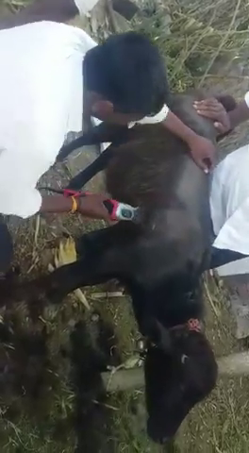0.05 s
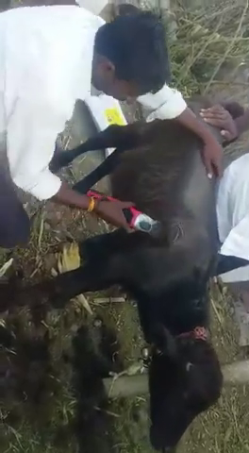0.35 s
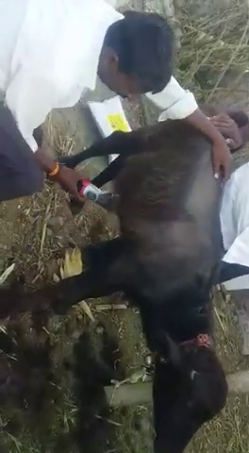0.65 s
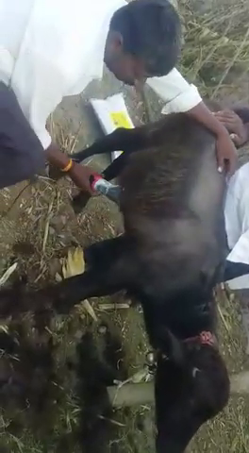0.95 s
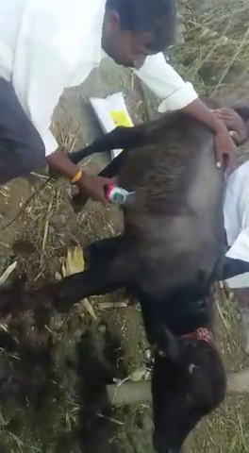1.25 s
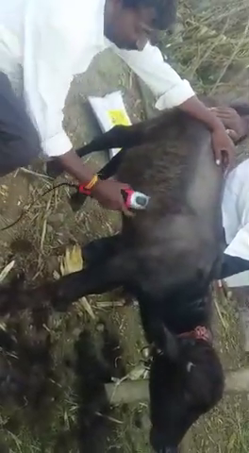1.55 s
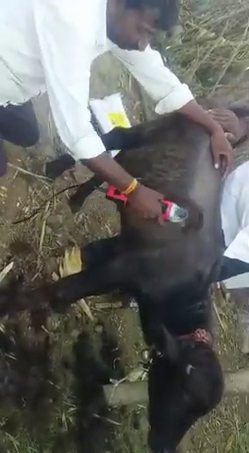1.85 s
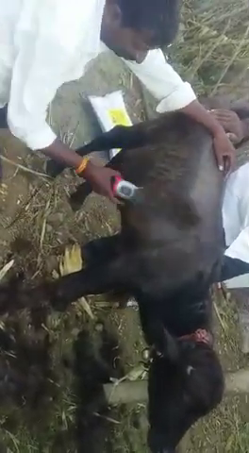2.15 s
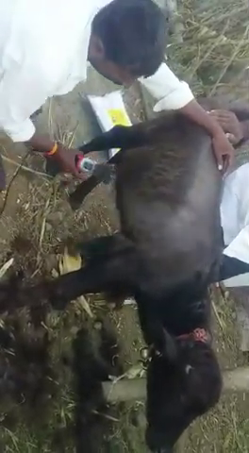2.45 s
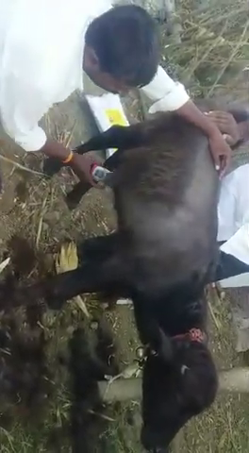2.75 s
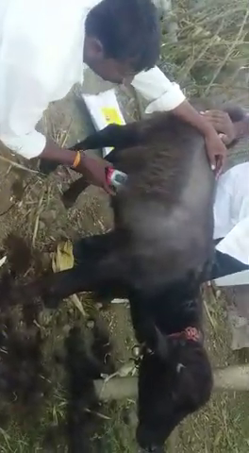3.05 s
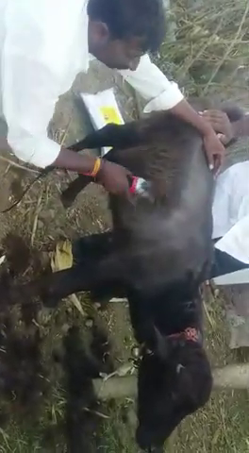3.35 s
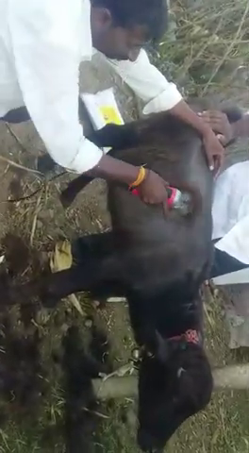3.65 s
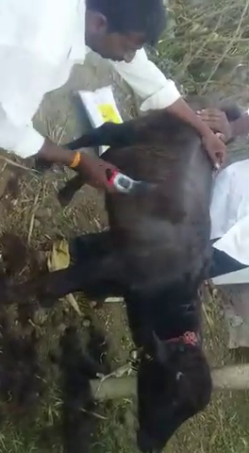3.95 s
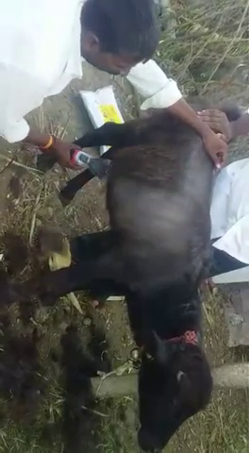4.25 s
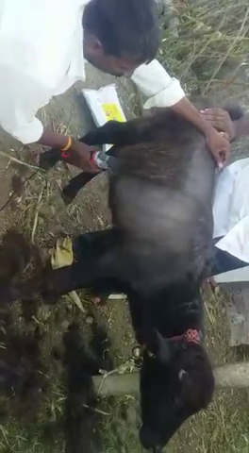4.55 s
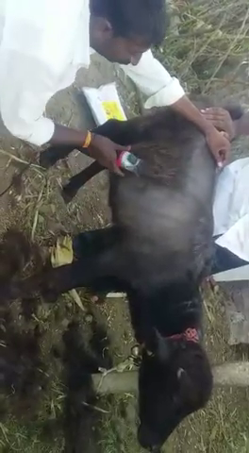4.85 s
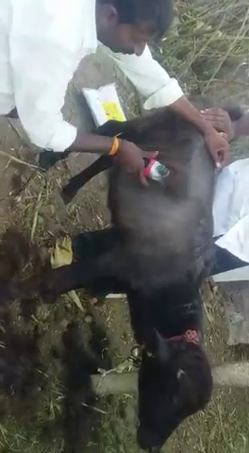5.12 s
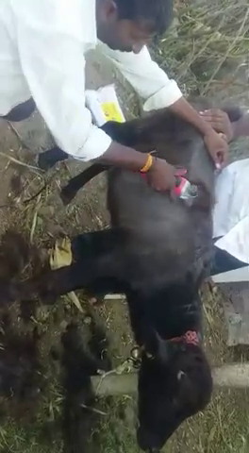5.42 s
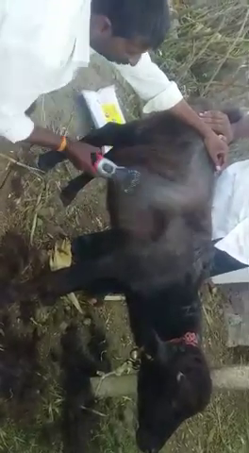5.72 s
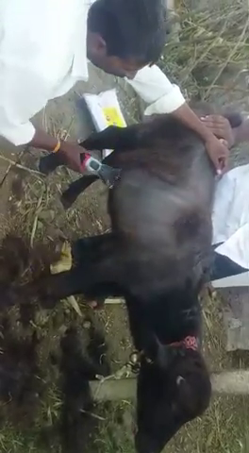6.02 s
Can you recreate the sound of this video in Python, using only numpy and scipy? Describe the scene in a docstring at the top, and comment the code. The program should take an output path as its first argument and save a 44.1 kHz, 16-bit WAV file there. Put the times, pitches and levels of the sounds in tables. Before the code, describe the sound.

An electric clipper buzzes and whines loudly as it shears a calf outdoors, with faint low bumps of wind on the microphone.

```python
"""An electric animal clipper shears a calf outdoors, in long passes through its coat.
Sliding friction of the cutter on its comb excites the housing, blade plates and tooth tips, biting
after each reversal. The gears whine at harmonics of the shaft rate, which sags under load,
and contact with the animal adds a low drone. Puffs of turbulent wind bump the microphone."""
import sys
import numpy as np
from scipy import signal
from scipy.fft import rfft, irfft, next_fast_len
from scipy.io import wavfile
from scipy.ndimage import uniform_filter1d, map_coordinates

SR = 44100
rng = np.random.default_rng(int(sys.argv[2]) if len(sys.argv) > 2 else 0)


def pcm_store(signal):
    """Save signal as 16-bit PCM."""
    levels = np.round(np.clip(np.atleast_2d(signal), -1, 1) * 32767)
    wavfile.write(sys.argv[1], SR, levels.astype(np.int16).T)


N = 268128

# Spectra of the rasp's four bands. Each row: frequency in Hz, relative spectral level in dB.
HOUSING_SPECTRUM = [(150, -67), (330, -18), (600, -27.5), (720, -15.5), (850, -13), (1050, -7.5),
                    (1400, -1.5), (2200, 0.5), (2550, -1), (2800, -5.5), (3200, -6.5), (3800, -77)]
BLADE_SPECTRUM = [(2400, -29), (3000, -16.5), (3380, -3), (3600, -1), (4000, 1), (4550, 0), (4800, -1),
                  (5200, -2.5), (5450, -0.5), (5800, -4), (6500, -28)]
TIP_SPECTRUM = [(5000, -37.5), (6000, -5.5), (6350, -2), (6900, -2), (7300, -0.5), (8100, 0), (8600, -8),
                (9300, -22), (10500, -45)]
FIZZ_SPECTRUM = [(7000, -13.5), (9300, 3.5), (10300, 0.5), (11200, 2.5), (14200, 1), (15700, -6)]

def cutter(turns, load):
    """Forced vibration: friction drives the housing, blade plates and tooth tips, with a fizz on top."""
    housing_db = loaded_level(load, free_db=-25.5, load_db=5.44, drift_db=0.2)
    blade_db = loaded_level(load, free_db=-23.5, load_db=3.1, drift_db=0.2)
    tips_db = loaded_level(load, free_db=-25, load_db=2, drift_db=0.2)
    pressure = mesh_pressure(turns)
    snag = amp(0.49 * wobble(60) + 0.16 * wobble(260))  # hair catches unevenly between the teeth

    def rasp(spectrum, throb_db, **sliding):
        return coloured(snag * amp(throb_db * pressure) * friction(turns, **sliding), spectrum)

    housing = rasp(HOUSING_SPECTRUM, throb_db=0, depth=1.11, repeat=0.4, grain_db=0.1)
    blade = rasp(BLADE_SPECTRUM, throb_db=0.86, depth=0.97, repeat=0.15, grain_db=1)
    tips = rasp(TIP_SPECTRUM, throb_db=2.2, depth=0.65, repeat=0.13, grain_db=1)
    fizz = rasp(FIZZ_SPECTRUM, throb_db=1.4, depth=0.83, repeat=0.074, grain_db=3)
    out = amp(housing_db) * resonances(housing, GRIP_MODES, patchy_db=1.68, chatter_db=1.85)
    out += amp(blade_db) * resonances(blade, GRIP_MODES, patchy_db=2.97, chatter_db=1.05)
    out += amp(tips_db) * resonances(tips, [], patchy_db=3.5, chatter_db=-0.5)
    return out + amp(-41 + 0.27 * wobble(3.3)) * resonances(fizz, [], patchy_db=1.5, chatter_db=2)


# Friction over one to-and-fro stroke. Each row: fraction of the stroke, relative level in dB.
STROKE_FRICTION = [(0, .5), (.15, -2.5), (.335, -6.5), (.37, 1), (.5, -.5), (.73, 1), (.835, -4.5),
                   (.875, 4.5), (.95, 2.5)]

def friction(turns, depth, repeat, grain_db):
    """Sliding friction: steel rubs partly the same track each stroke, stalls at reversal, then bites."""
    strokes = turns * (13 / 28)  # gear ratio
    place = strokes % 1
    track = rng.standard_normal(int(N / strokes[-1]))
    recurring = unit(map_coordinates(track, [place * len(track)], mode="grid-wrap"))
    grit = np.sqrt(repeat) * recurring + np.sqrt(1 - repeat) * rng.standard_normal(N)
    friction_db = depth * np.interp(place, *np.transpose(STROKE_FRICTION), period=1)
    return grit * amp(friction_db + grain_db * wobble(700))


# Modes of housing and blade plate that sing out as the grip shifts.
# Each row: peak time in seconds, half length in seconds, frequency in Hz, relative lift in dB.
GRIP_MODES = [(.15, 0.86, 2560, 5), (0.386, 0.14, 2250, 10.5), (1.656, 0.099, 1400, 11),
              (1.97, 0.12, 3790, 13), (2.004, 0.05, 1910, 5), (2.26, .1, 2230, 6.5), (2.79, .13, 1540, 12),
              (3.084, 0.052, 4020, 8), (3.83, 0.17, 1810, 8), (3.82, .12, 3150, 8), (3.862, 0.11, 3730, 11),
              (5.065, 0.16, 2000, 1.5), (5.144, .13, 3960, 5.5), (5.276, 0.039, 2340, 9.5),
              (5.427, 0.14, 3660, 4), (5.592, .14, 2170, 6.5), (5.953, 0.2, 1690, 12.5)]

def resonances(x, modes, patchy_db, chatter_db):
    """Modal resonance: peaks come and go, slowly with the grip, quickly as bites ring other modes."""
    hz, t, spectrogram = signal.stft(x, SR, nperseg=512, noverlap=384)
    lift_db = patchy_db * patches(spectrogram.shape, size=(3, 80))
    lift_db += chatter_db * patches(spectrogram.shape, size=(4, 5))
    for peak_s, half_s, mode_hz, db in modes:
        width_hz = 0.11 * mode_hz
        detuning = 2 * (hz[:, None] - mode_hz) / width_hz
        lift_db += db * np.exp(-((t - peak_s) / half_s) ** 2) / (1 + detuning ** 2)
    _, ringing = signal.istft(spectrogram * amp(lift_db), SR, nperseg=512, noverlap=384)
    return steady(ringing[:N], span_s=0.383)


# Faint low gear tones. Each row: shaft order in cycles per turn, level in dB.
GEAR_HUM = [(16, -57), (31, -41), (32, -46.5), (33, -43)]

def gears(turns, load):
    """Shaft harmonics: three throbbing mesh tones, an even motor whistle and a faint hum."""
    low_db = loaded_level(load, free_db=-32, load_db=2.1, drift_db=3.5) + swell(order=64)
    whistle_db = loaded_level(load, free_db=-31.5, load_db=-8.5, drift_db=-1.5) + swell(order=80)
    mid_db = loaded_level(load, free_db=-29, load_db=-2.3, drift_db=0.85) + swell(order=96)
    high_db = loaded_level(load, free_db=-32.5, load_db=0.5, drift_db=-0.5) + swell(order=128)
    out = amp(low_db) * gear_tone(turns, order=64, throb_db=7, swing_rad=0.9, waver_rad=0.32)
    out += amp(whistle_db) * gear_tone(turns, order=80, throb_db=1, swing_rad=0.1, waver_rad=0.2)
    out += amp(mid_db) * gear_tone(turns, order=96, throb_db=10, swing_rad=0.4, waver_rad=0.3)
    out += amp(high_db) * gear_tone(turns, order=128, throb_db=11, swing_rad=0.8, waver_rad=0.6)
    for order, db in GEAR_HUM:
        out += amp(db + wobble(4.5)) * unit(np.sin(2 * np.pi * order * turns + 0.5 * wobble(13)))
    return out


def gear_tone(turns, order, throb_db, swing_rad, waver_rad):
    """Amplitude and phase modulation: one harmonic throbs and swings once a shaft turn."""
    swing = swing_rad * np.cos(2 * np.pi * (turns - 0.93))
    phase = 2 * np.pi * order * turns + swing + waver_rad * wobble(25)
    return unit(np.sin(phase) * amp(throb_db * mesh_pressure(turns) + wobble(40)))


def mesh_pressure(turns):
    """Eccentricity: the gear runs slightly off centre, so its teeth press hardest once a turn."""
    angle = 2 * np.pi * (turns - 0.93)
    return 0.79 * np.cos(angle) + 0.26 * np.cos(2 * angle)


# Swells of the whine. Each row: peak time in seconds, half length in seconds, shaft order, gain in dB.
WHINE_SWELLS = [(.1, .15, 64, -4), (.45, 0.2, 64, 1), (2.75, .15, 64, -7), (1.78, 0.31, 64, 5),
                (4.146, .08, 64, 4), (.97, 0.16, 64, -10), (5.04, 0.29, 64, -14), (.03, 0.11, 80, 11.5),
                (0.92, 0.2, 80, -11), (1.614, 0.099, 80, 7.5), (2.952, 0.19, 80, 1.5), (4.3, .15, 80, 0.5),
                (.28, 0.25, 96, -9), (1.25, 0.26, 96, 1.5), (1.84, 0.15, 96, -6), (2.39, 0.12, 96, -11),
                (3.1, .08, 96, 7.5), (3.327, .09, 96, 5.5), (4.054, 0.11, 96, 5.5), (4.34, 0.14, 96, -6),
                (4.7, 0.17, 96, 3.5), (5.06, 0.11, 96, 5.5), (5.3, .12, 96, -7), (5.6, 0.027, 96, 9),
                (6.06, .1, 96, -13), (0.175, .07, 128, 9.5), (.43, 0.046, 128, 10), (1.7, 0.08, 128, -8),
                (5.8, .08, 128, 12), (7.6, .12, 128, 9)]

def swell(order):
    """Slow amplitude modulation, in dB: one tone swells or fades for a moment."""
    t = np.arange(N) / SR
    return sum(db * np.exp(-((t - peak_s) / half_s) ** 2)
               for peak_s, half_s, tone_order, db in WHINE_SWELLS if tone_order == order)


# Gear shaft speed, sagging in each pass. Each row: time in seconds, speed in turns per second.
SHAFT_SPEED = [(0.0, 57.97), (0.56, 57.88), (0.88, 58.1), (1.08, 57.92), (1.73, 56.3), (2.04, 56.6),
               (2.6, 57.62), (2.88, 57.52), (3.29, 55.97), (3.61, 55.61), (4.01, 55.96), (4.43, 56.64),
               (4.67, 56.64), (5.02, 55.12), (5.24, 54.82), (6.08, 55.98)]

def shaft_turns():
    """Rotation is the time integral of shaft speed."""
    return np.cumsum(curve(SHAFT_SPEED)) / SR


# Passes through the coat.
# Each row: start in seconds, lift-off in seconds, relative load, relative drone level in dB.
COAT_PASSES = [(-.4, 0.46, 0.93, -57), (1.295, 2.132, 0.85, -45.5), (3.083, 3.993, 1.05, -42.5),
               (4.72, 5.683, 0.85, -41)]
DIG_IN_S, LIFT_OFF_S = 0.35, 0.081  # time constants of the load

def coat_load():
    """Mechanical load builds as the comb digs into the hair and drops when it lifts off."""
    return sum(load * envelope(start, end, DIG_IN_S, LIFT_OFF_S) for start, end, load, _ in COAT_PASSES)


def drone(turns):
    """Contact coupling: pressing on the animal brings out a low rasp and the 13-tooth pinion's note."""
    press = sum(amp(db) * envelope(start, end, DIG_IN_S, LIFT_OFF_S) ** 2
                for start, end, _, db in COAT_PASSES)
    rasp = (amp(-58.5) + press) * amp(2.5) * low_rasp(turns)  # faint while running free
    pinion = np.sin(2 * np.pi * 13 * turns + 0.35 * wobble(12))
    return rasp + press * amp(-4) * pinion


# Spectrum of the drone's rasp. Each row: frequency in Hz, relative spectral level in dB.
DRONE_SPECTRUM = [(400, -20), (560, -25), (660, -3), (740, 3), (850, 2), (1000, -1), (1400, -20)]

def low_rasp(turns):
    """Band-pass filtering keeps the friction noise near 800 Hz."""
    sliding = friction(turns, depth=0.71, repeat=0.21, grain_db=5.5)
    return steady(coloured(sliding, DRONE_SPECTRUM), span_s=0.15)


# Breeze at the microphone. Each row: time in seconds, relative level in dB.
BREEZE_LEVELS = [(0, -62), (.95, -72), (1.3, -42), (1.65, -38), (2.05, -30), (2.38, -47.5), (2.8, -45),
                 (3.05, -36), (4.08, -30.5), (4.38, -54), (4.9, -39.5), (5.62, -52), (5.95, -35.5)]
# Gusts on top of it. Each row: start in seconds, length in seconds, relative level in dB.
WIND_GUSTS = [(1.117, .08, -33), (1.297, 0.21, -33), (1.403, 0.026, -27.5), (1.693, 0.083, -22),
              (1.835, 0.017, -23.5), (2.215, 0.058, -30), (2.455, 0.022, -30), (2.508, 0.053, -27.5),
              (2.941, 0.12, -29), (3.304, 0.16, -33), (3.56, 0.072, -16.5), (3.69, 0.086, -24),
              (3.797, 0.036, -20.5), (3.855, 0.064, -19), (3.969, 0.047, -15.5), (4.164, 0.1, -29.5),
              (4.403, 0.079, -37), (4.756, 0.018, -26), (4.956, 0.052, -23), (5.342, .035, -29),
              (5.404, 0.095, -36), (5.686, 0.018, -29), (5.842, 0.043, -28.5), (6.03, 0.063, -29)]
# Spectra of the wind's three parts. Each row: frequency in Hz, relative spectral level in dB.
BUFFET_SPECTRUM = [(20, -50), (32, -28), (50, -8), (75, 2), (125, 3.5), (200, -6.5), (280, -18.5),
                   (400, -24.5), (560, -33), (900, -70)]
EDDY_SPECTRUM = [(100, -29), (190, 10), (260, 3), (400, -2.5), (500, -14), (700, -36), (1500, -70)]
PUFF_SPECTRUM = [(30, -38), (70, -10), (130, 7.5), (280, -2.5), (450, -10.5), (700, -16), (1500, -57)]

def wind():
    """Turbulence: low buffeting brightens as it grows, and each gust opens with a brief puff."""
    power = amp(curve(BREEZE_LEVELS) + 2.5 * wobble(22)) ** 2
    puff_gain = np.zeros(N)
    for start, length, db in WIND_GUSTS:
        power += (amp(db) * envelope(start, start + length, rise_s=0.0027, fall_s=0.0099)) ** 2
        puff_gain += amp(1.82 * db + 13.5) * envelope(start, start, rise_s=0.0047, fall_s=0.02)
    wind_db = 10 * np.log10(power)
    buffet = amp(wind_db - 3.5) * steady_noise(BUFFET_SPECTRUM, span_s=0.0424)
    eddies = amp(1.506 * wind_db - 3.5) * steady_noise(EDDY_SPECTRUM, span_s=0.024)
    puffs = puff_gain * steady_noise(PUFF_SPECTRUM, span_s=0.017)
    bass_cut = signal.butter(4, 52, "high", fs=SR, output="sos")  # a small microphone passes no deep bass
    return signal.sosfilt(bass_cut, buffet + eddies + puffs)


def loaded_level(load, free_db, load_db, drift_db):
    """A level in dB, linear in the load, with random drift."""
    return free_db + load_db * load + drift_db * wobble(7.9)


def amp(db):
    """Decibels to gain."""
    return 10 ** (np.asarray(db) / 20)


def unit(x):
    """Normalisation to rms 1."""
    return x / np.sqrt(np.mean(x ** 2) + 1e-20)


def steady(x, span_s):
    """Normalisation to rms 1 over a sliding window."""
    return x / np.sqrt(np.abs(uniform_filter1d(x ** 2, int(span_s * SR))) + 1e-12)


def steady_noise(spectrum, span_s):
    """Coloured noise held at rms 1."""
    return steady(coloured(rng.standard_normal(N), spectrum), span_s)


def curve(rows):
    """Linear interpolation of (seconds, value) rows at every sample."""
    return np.interp(np.arange(N) / SR, *np.transpose(rows))


def envelope(start, end, rise_s, fall_s):
    """Exponential rise towards 1 from start, exponential decay after end."""
    t = np.arange(N) / SR
    rise = 1 - np.exp(-np.maximum(t - start, 0) / rise_s)
    return rise * np.exp(-np.maximum(t - end, 0) / fall_s)


def wobble(rate):
    """A smooth random curve, rate knots a second."""
    knots = rng.standard_normal(int(N * rate / SR) + 4)
    return map_coordinates(knots, [np.arange(N) * rate / SR])


def patches(shape, size):
    """A random field over frequency and time, averaged over size cells."""
    across_frequency = uniform_filter1d(rng.standard_normal(shape), size[0], axis=0)
    return unit(uniform_filter1d(across_frequency, size[1], axis=1))


def filtered(x, response):
    """Linear filtering: the spectrum of x times a frequency response."""
    size = next_fast_len(N + SR // 4)
    return irfft(rfft(x, size) * response(np.fft.rfftfreq(size, 1 / SR)), size)[:N]


def coloured(x, spectrum):
    """Spectral shaping by (Hz, dB) points, at rms 1."""
    points_hz, db = np.transpose(spectrum)
    return unit(filtered(x, lambda hz: amp(np.interp(np.log(hz + 1), np.log(points_hz), db))))


def scene():
    """Superposition of clipper and wind; one shaft times cutter, drone and gears."""
    turns = shaft_turns()
    load = coat_load()
    return (cutter(turns, load) + drone(turns) + gears(turns, load) + wind())[None]


def record(dry):
    """Soft saturation rounds the highest peaks, and a band limit cuts the top treble."""
    ceiling, top_hz = 0.92, 15720
    rounded = dry[0] / (1 + (dry[0] / ceiling) ** 8) ** (1 / 8)
    return filtered(rounded, lambda hz: hz < top_hz)[None]


dry = scene()
out = record(dry)
pcm_store(out)
```